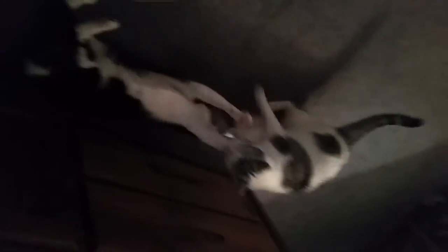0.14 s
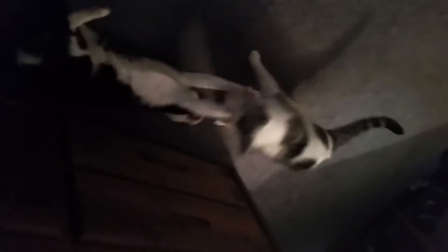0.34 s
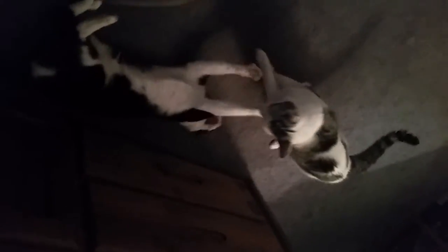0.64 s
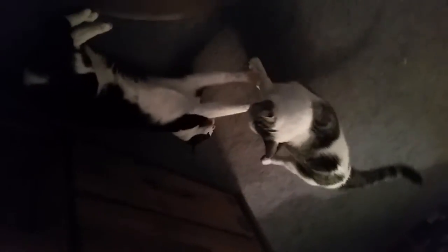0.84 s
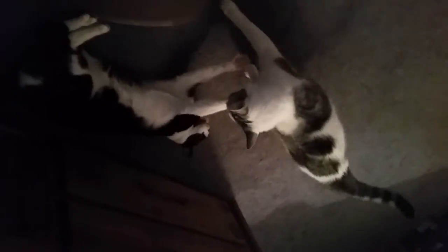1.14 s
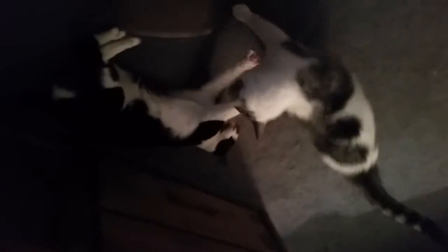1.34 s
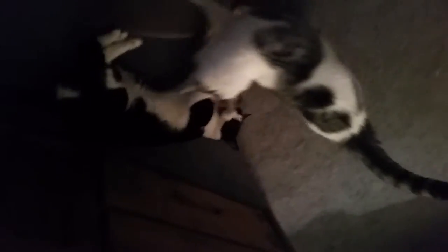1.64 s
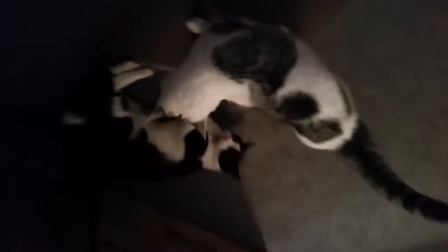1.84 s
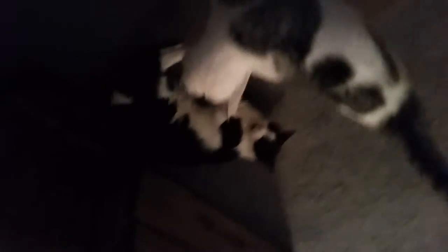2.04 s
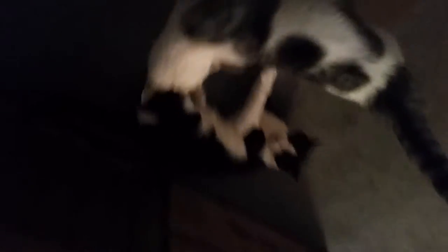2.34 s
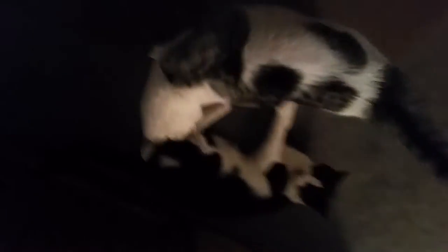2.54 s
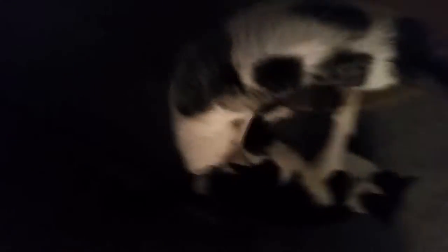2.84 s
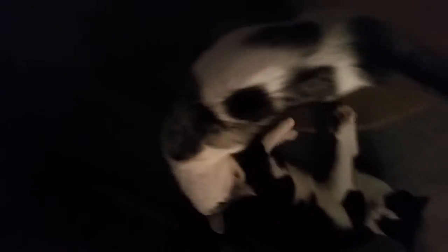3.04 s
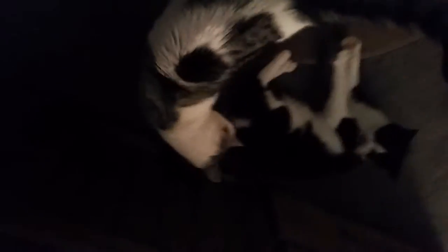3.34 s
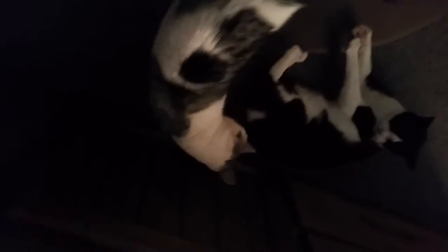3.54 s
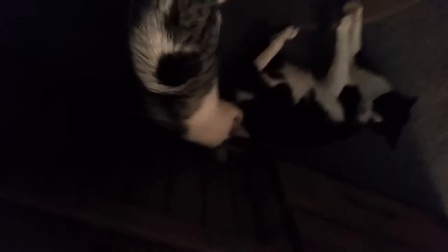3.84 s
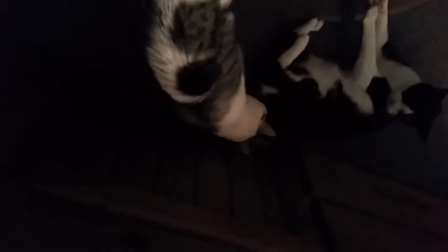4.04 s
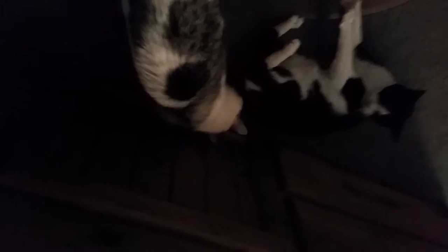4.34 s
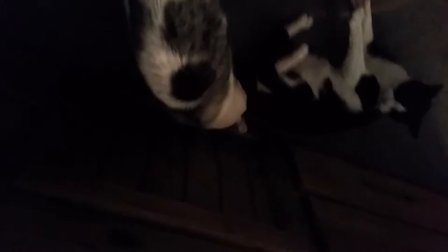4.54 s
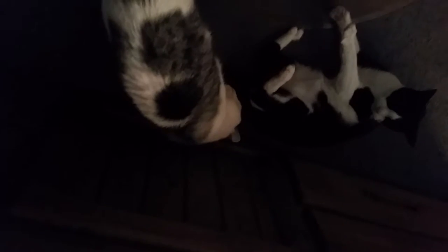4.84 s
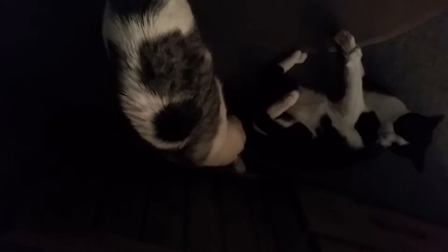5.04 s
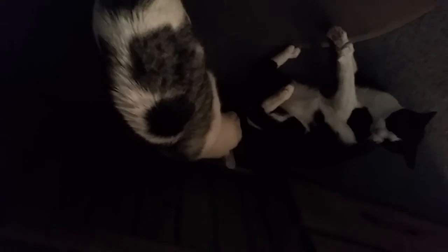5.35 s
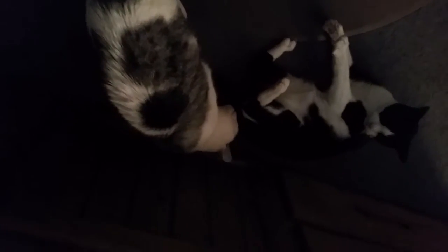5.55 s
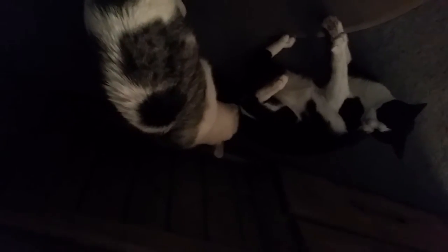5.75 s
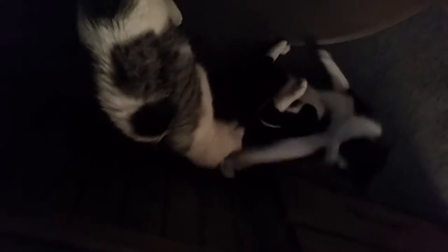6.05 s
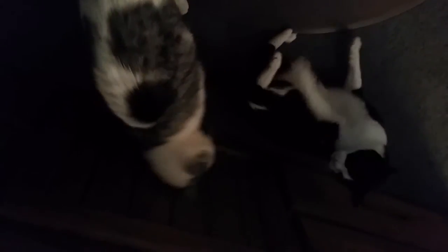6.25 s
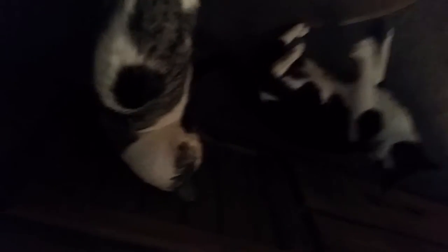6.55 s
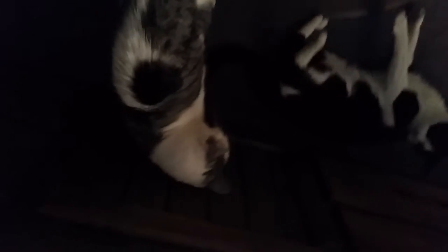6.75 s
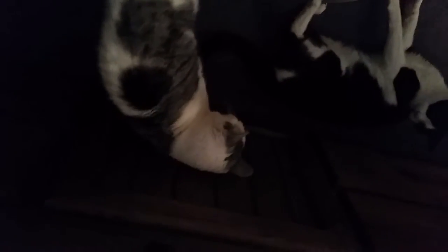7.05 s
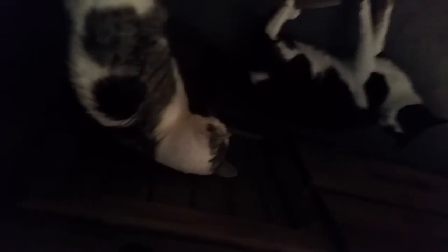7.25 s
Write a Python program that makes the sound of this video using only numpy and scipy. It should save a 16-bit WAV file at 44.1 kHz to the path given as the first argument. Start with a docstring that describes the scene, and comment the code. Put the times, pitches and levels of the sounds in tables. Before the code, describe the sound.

Dull handling pops and short creaks bump close to the microphone while two cats scuffle in soft fur rustles over a steady low appliance hum.

```python
"""A quiet carpeted room where an appliance hums: two cats wrestle near a hand-held recorder.
A finger on the left microphone port sticks and slips: pressure bumps, high-passed by the vent, give
dull pops and short creaks. A palm shifts at the right port. Fur on pile is shaped noise in bright bursts;
claws are four decaying sine ticks with scuffs. Hum is wavering tones; room tone is stereo noise."""
import sys
import numpy as np
from scipy import signal
from scipy.io import wavfile
from scipy.ndimage import uniform_filter1d

SR = 44100
rng = np.random.default_rng(int(sys.argv[2]) if len(sys.argv) > 2 else 0)


def transcribe(u):
    """Save the signal u as a 16-bit wav file named by the first command-line argument.

    u: samples, shape (n,) or (channels, n), limited to [-1, 1]; the rate is SR.
    q: integer samples, one column per channel.
    """
    v = np.clip(np.atleast_2d(u).T, -1, 1)
    q = np.round(v * 32767).astype(np.int16)
    wavfile.write(sys.argv[1], SR, q)


N = 326340


def gain_of(db):
    """Decibels to gain."""
    return 10 ** (np.asarray(db) / 20)


def evened(x):
    """Scales to rms 1."""
    return x / np.sqrt(np.mean(x ** 2) + 1e-20)


def read(points, hz):
    """Reads a spectrum table on a log frequency axis."""
    point_hz, value = np.transpose(points)
    return np.interp(np.log(hz + 1), np.log(point_hz + 1), value)


def curve(rows, t):
    """Reads every column of a curve at times t."""
    s, *columns = np.transpose(rows)
    return [np.interp(t, s, column) for column in columns]


def add(mix, s, sound):
    """Mixes a sound in at s seconds, cut at the end of the mix."""
    part = mix[..., round(s * SR):][..., :sound.shape[-1]]
    part += sound[..., :part.shape[-1]]


def low_pass(x, order, hz):
    """Butterworth low-pass."""
    return signal.sosfilt(signal.butter(order, hz, fs=SR, output="sos"), x)


def band(x, lo_hz, hi_hz):
    """Gentle band-pass."""
    return signal.sosfilt(signal.butter(2, [lo_hz, hi_hz], "band", fs=SR, output="sos"), x)


def hiss(colour, side, same, patchy_db, size=1024):
    """Stereo noise with drifting patches, mid rms 1; side tips it between ports, same sets their likeness."""
    hop = size // 4
    frames, hz = N // hop + 5, np.fft.rfftfreq(size, 1 / SR)
    a, b, c, d, patches = rng.standard_normal((frames, len(hz), 5)).T
    patches = uniform_filter1d(patches, size=9, axis=0)  # over frequency
    patches = evened(uniform_filter1d(patches, size=12, axis=1))  # over time
    same = np.clip(read(same, hz), -1, 1)[:, None]
    left, other = a + 1j * b, c + 1j * d
    right = same * left + np.sqrt(1 - same ** 2) * other
    spectra = np.array([left, right])
    spectra *= gain_of(read(colour, hz)[:, None] + patchy_db * patches)
    spectra *= gain_of(np.outer([.5, -.5], read(side, hz)))[:, :, None]
    out = signal.istft(spectra, nperseg=size, noverlap=size - hop)[1][:, :N]
    return out / np.sqrt(np.mean(out.mean(0) ** 2))


# Room tone spectrum. Each row: frequency in Hz, relative density in dB per Hz.
ROOM_COLOUR = [(88, -44), (165, -5), (363, -7.5), (523, -20.5), (750, -17), (1320, -34.5), (1790, -22),
               (2300, -31), (2890, -45.5), (3650, -36), (6120, -48), (8400, -40.5), (9700, -57),
               (11500, -45), (14600, -45)]
# Room tone likeness of the ports. Each row: frequency in Hz, left-right correlation from -1 to 1.
ROOM_SAME = [(60, 0.17), (150, 1), (380, 0.76), (950, 0.069), (2380, -0.56), (5980, 0.092), (15000, -0.17)]
# Room tone balance. Each row: frequency in Hz, left minus right in dB.
ROOM_SIDE = [(130, -6), (400, -4.5), (1400, -5), (3100, -10), (6100, -7), (9000, -2.5), (14000, 3.5)]
ROOM_DB = -49.5


def room_tone():
    """Steady coloured noise whose likeness between the ports varies with frequency."""
    return gain_of(ROOM_DB) * hiss(ROOM_COLOUR, ROOM_SIDE, ROOM_SAME, patchy_db=.4)


# Appliance tones. Each row: frequency in Hz, rms level in dB, wavering share from 0 to 1, fuzz width in Hz.
HUM_TONES = [(119.3, -45, 0.058, 3), (291.8, -54.5, 0.72, 3.1), (375.2, -61, 0.75, 6), (427, -63.5, 1, 5.2),
             (766.4, -65.5, 0.88, 23), (896, -70, 0.9, 22)]


def appliance():
    """Tones, each a steady part plus narrow noise around it."""
    t, out = np.arange(N) / SR, np.zeros(N)
    for hz, db, share, width_hz in HUM_TONES:
        r = np.exp(-np.pi * width_hz / SR)
        noise = rng.standard_normal(N) + 1j * rng.standard_normal(N)
        waver = signal.lfilter([1], [1, -r], noise)
        size = 1 - share + share * waver / waver.std()
        tone = (size * np.exp(2j * np.pi * hz * t)).real
        out += gain_of(db) * evened(tone)
    return out * gain_of([[-.5], [.5]])


# Claw ticks. Each row: start in seconds, tick level in dB, left minus right in dB, ring in Hz,
# scuff level re tick in dB, scuff t60 in seconds.
CLAW_TICKS = [(.6152, -28.5, -11, 3100, -18.5, 0.23), (.861, -50, -8, 7100, -21, .2),
              (5.7996, -36, -17, 760, -24.5, 0.05), (4.338, -38.5, -14, 530, -30, 0.086)]
# Scuffed pile spectrum. Each row: frequency in Hz, relative density in dB per Hz.
SCUFF_COLOUR = [(500, -10), (1100, -3), (1900, 1), (3200, -8.5), (5500, -11), (8800, -28), (11000, -68)]


def claws():
    """A short ringing tick, with a scuff of pile that dies away."""
    out, t = np.zeros((2, N)), np.arange(SR // 5) / SR
    scuff = hiss(SCUFF_COLOUR, [(0, 0), (SR, 0)], [(0, .3), (SR, .3)], patchy_db=0.5, size=256)
    for s, db, pan_db, hz, scuff_db, t60_s in CLAW_TICKS:
        decay = gain_of(-60 * t * hz / 8)  # 60 dB in 8 cycles
        attack = np.minimum(t * hz * 3, 1)  # a third of a cycle
        tick = np.sin(2 * np.pi * hz * t) * decay * attack
        tail = scuff[:, round(s * SR):][:, :len(t)] * gain_of(scuff_db - 60 * t / t60_s)
        add(out, s, (tick + tail) * gain_of(db + pan_db * np.array([[.5], [-.5]])))
    return out


# Strokes of fur. Each row: start in seconds, length in seconds, level before the mid-stroke arch in dB,
# swell across the stroke in dB, hollow whistle re stroke in dB.
STROKES = [(0.148, 0.049, -70.5, 0, -6), (.28, 0.044, -73, 0, -9), (1.34, 0.08, -73, 4, -18),
           (2, 0.12, -63.5, -2, -25), (2.428, 0.16, -48.5, 10, -24), (2.638, 0.057, -68.5, 0, -21),
           (2.91, 0.14, -46, 10, -32), (3.054, 0.75, -77, 3, -2), (3.285, 0.076, -58.5, 10, -8),
           (3.361, 0.041, -66, 3, -12), (3.429, 0.037, -65, 3, -4), (3.49, 0.11, -57.5, 9.5, -5),
           (3.705, 0.1, -63.5, 5.5, -11.5), (3.981, 0.1, -55.5, 4.5, -17), (4.31, 0.1, -67.5, 3, -11),
           (4.415, 0.11, -69.5, -1.5, -15), (4.588, 0.11, -58, 6, -20), (4.695, 0.1, -62, 6, -16)]
# Fur hiss spectrum. Each row: frequency in Hz, relative density in dB per Hz.
FUR_COLOUR = [(400, -33.5), (900, -14), (1900, 3), (2900, -9.5), (4200, -5.5), (5300, -3.5), (6000, -13),
              (7300, -1.5), (8800, -0.5), (10200, -11), (11800, -1), (13800, 1), (14800, -3.5)]
# Fur balance. Each row: frequency in Hz, left minus right in dB.
FUR_BALANCE = [(1000, -2), (3000, -8), (5000, -10), (6100, -18), (7600, -11), (10000, -13), (13000, -12)]
# Hollow whistle spectrum. Each row: frequency in Hz, relative density in dB per Hz.
WHISTLE_COLOUR = [(3900, -25), (4700, -6), (5250, 0), (5800, -7), (6600, -25)]
TAIL_T60_S, TAIL_GAIN = .45, .55


def rustle():
    """Strokes of fur on pile: fine hiss, louder at the uncovered right port, with a fading room tail."""
    level, hollow = np.zeros((2, N))
    for s, length_s, db, swell_db, whistle_db in STROKES:
        u = np.arange(0, 1, 1 / (length_s * SR))
        arch_db = 2.5 - 7 * (2 * u - 1) ** 2  # fastest mid-stroke
        stroke_db = db + swell_db * (u - 1.0) + arch_db
        stroke = gain_of(stroke_db) * signal.windows.tukey(len(u), .3)
        add(level, s, stroke)
        add(hollow, s, stroke * gain_of(whistle_db))
    r = np.exp(-np.log(1000) / (TAIL_T60_S * SR))
    tail = signal.lfilter([1 - r], [1, -r], level)
    level = np.hypot(level, TAIL_GAIN * tail)
    apart = [(0, 0), (SR, 0)]  # ports uncorrelated
    fur = hiss(FUR_COLOUR, FUR_BALANCE, apart, patchy_db=2.0, size=256)
    whistle = hiss(WHISTLE_COLOUR, FUR_BALANCE, apart, patchy_db=1.5, size=256)
    return level * fur + hollow * whistle


def push(u, skew):
    """One smooth bump of pressure over u = 0..1; skew under 1 starts suddenly."""
    return np.sin(np.pi * np.clip(u, 0, 1) ** np.clip(skew, .2, 1.5)) ** 2


def bump(length_ms, skew):
    """A push sampled over length_ms."""
    return push(np.arange(0, length_ms, 1000 / SR) / length_ms, skew)


SLOW_SKEW, SKEW_PER_RATE = 0.36, 0.0017  # slower creaks let go more suddenly


def creak(s, length_s, rate_hz, end_rate_hz, pressure, end_pressure, share):
    """Skin sticks and lets go again and again, each slip a little unlike the last."""
    u = np.arange(0, 1, 1 / (length_s * SR))
    rate_hz = rate_hz + (end_rate_hz - rate_hz) * u
    pressure = pressure + (end_pressure - pressure) * u
    wobble = evened(uniform_filter1d(rng.standard_normal(len(u)), size=200))
    turns = np.cumsum(rate_hz * (1 + .1 * wobble)) / SR
    uneven = gain_of(2.4 * rng.standard_normal(64))[turns.astype(int)]  # one gain a slip
    slips = push(turns % 1 / share, SLOW_SKEW + SKEW_PER_RATE * rate_hz)
    return slips * pressure * uneven * signal.windows.tukey(len(u), .1)


def small_slips():
    """Small unsteady slips of either sign, soft and hard, about 60 a second."""
    chance, sign, hardness = rng.random((N, 3)).T
    hits = (chance < 60 / SR) * np.sign(sign - .5) * gain_of(-4.0 * np.log(hardness + 0.003))
    return gain_of(-40.0) * signal.oaconvolve(hits, push(np.linspace(0, 1, 260), 0.84))[:N]


def judder(pressure):
    """Skin judders while the pressure builds, far more in sudden slips."""
    building = uniform_filter1d(np.maximum(np.gradient(abs(pressure)), 0), size=60)
    noise = evened(band(rng.standard_normal(N), 410, 1480))
    return gain_of(24.5) * abs(building) ** 1.66 * noise


PORT_HZ, PORT_WIDTH_HZ, PORT_EDGE_HZ = 1900, 1900, 3000
VENT_HZ = 80


def port(air):
    """A port resonates broadly and passes little above; pressure leaks away below VENT_HZ."""
    r = np.exp(-np.pi * PORT_WIDTH_HZ / SR)
    poles = [1, -2 * r * np.cos(2 * np.pi * PORT_HZ / SR), r * r]
    air = low_pass(signal.lfilter([sum(poles)], poles, air), 3, PORT_EDGE_HZ)
    return signal.sosfilt(signal.butter(3, VENT_HZ, "high", fs=SR, output="sos"), air)


# Fingertip slips over the left port. Each row: start in seconds, relative pressure (+ push, - pull),
# length in ms, skew (under 1 = sudden start).
FINGER_SLIPS = [(0.508, 0.07, 1.64, 0.59), (0.5268, 0.21, 3.6, 0.68), (0.5372, 0.33, 4.1, 0.54),
                (0.5561, 0.67, 3.6, .62), (0.5832, 0.18, 2.1, 0.73), (0.5871, 0.71, 2.76, 0.55),
                (0.6772, 0.15, 2.16, 1.5), (0.6812, 1.01, 4, 0.52), (0.7014, 0.14, 2.6, 0.75),
                (0.7026, 0.26, 1.35, 0.95), (0.7127, 0.99, 6.4, 0.52), (0.7122, -0.038, 1, 0.79),
                (0.731, 0.14, 3.1, 0.6), (0.7401, 1.18, 5, 0.67), (0.7598, -0.1, 2.2, 1),
                (0.7605, 0.16, 1, 0.62), (0.7735, 1.17, 5.1, 0.59), (0.8024, -0.19, 5.7, 1.05),
                (0.9843, -0.085, 5.1, 0.66), (1.0174, -0.077, 5.2, 0.64), (1.0837, -0.11, 4.6, 0.72),
                (1.2421, -0.11, 5.1, 0.63), (1.264, -0.11, 4.2, 0.69), (1.782, -0.38, 4.4, 0.75),
                (1.8857, -0.16, 3.5, 0.6), (1.9112, -0.16, 7.5, 0.48), (2.0372, 0.17, 1.8, 0.69),
                (2.05, -0.23, 1.7, 0.57), (2.067, -0.45, 5.0, 0.45), (2.0819, -0.3, 3.9, 0.55),
                (2.269, 0.085, 2.8, 0.65), (2.4664, 0.16, 1.6, 0.7), (2.6805, -0.22, 14, .66),
                (2.6878, 0.06, 2.1, 0.77), (2.741, 0.26, 7, .74), (2.957, -0.14, 3.9, 0.84),
                (2.969, -0.065, 3.2, 0.53), (2.986, -0.16, 5.9, 0.62), (3.0034, -0.22, 8.7, 0.6),
                (3.02, -0.25, 6.1, 1.24), (3.0307, -0.31, 7.8, 0.94), (3.066, -0.17, 8.8, 0.78),
                (3.0967, 0.1, 7.1, 0.76), (4.3377, 0.12, 11, 0.5), (4.765, 0.09, 3.0, 0.56),
                (4.8627, 0.29, 6.7, .9), (4.8723, 0.49, 6.3, 0.82), (4.8844, 0.48, 5.2, 0.73),
                (4.9015, 0.37, 9.4, 0.65), (4.9355, 0.34, 7.3, 0.92), (4.9354, 0.14, 2.4, 1.05),
                (4.9621, 0.32, 3.6, 0.86), (4.9797, 0.42, 4.5, 1.13), (4.997, 0.3, 4.3, 0.66),
                (5.0373, 0.08, 2.7, 0.61), (5.04, 0.45, 4.1, 0.61), (5.0494, 0.98, 7.2, 0.55),
                (5.0598, -0.02, 2.9, .51), (5.0617, 0.15, 0.77, 0.81), (5.0624, 0.92, 5.3, 1.23),
                (5.0806, 0.34, 1.67, 0.61), (5.4152, 0.11, 3.3, 0.66), (5.709, 0.19, 16, 0.81),
                (6.2133, 0.084, 8.6, 1.1), (6.8936, -0.16, 6.5, 1.16), (7.1802, 0.099, 9.2, 0.52),
                (7.3155, -0.12, 11, 0.48)]
# Palm shifts against the right port. Each row: start in seconds, relative pressure, length in ms.
PALM_SHIFTS = [(3.4325, -0.22, 20), (3.443, 0.24, 7.9), (4.0025, -0.27, 8.8), (4.0123, -0.1, 8.1),
               (4.0365, 0.1, 13), (5.095, 0.15, 14)]
# Runs of slips. Each row: start in seconds, length in seconds, slips per second at start, at end,
# relative pressure at start, at end, share of the cycle spent slipping.
CREAK_RUNS = [(2.023, 0.047, 86, 82, -0.37, -0.5, 1), (2.0267, 0.033, 77, 75, -0.55, -0.31, 0.52),
              (2.467, .066, 235, 233, 0.1, 0.23, 0.74), (2.533, .05, 122, 85, 0.48, .36, .7),
              (2.905, 0.048, 300, 190, -0.13, -.3, 0.76)]
# Restless grip. Each row: time in seconds, slow squeeze in dB before the port balance,
# fine scrape in dB before the port filter.
GRIP_CURVE = [(0, -58, -61.5), (.5, -44, -63), (.8, -47.5, -61.5), (1.3, -49.5, -65.5), (1.8, -61, -74),
              (1.96, -44, -51.5), (2.04, -37, -52.5), (2.13, -45, -60), (2.44, -53, -69), (2.53, -43, -64),
              (2.88, -48, -70), (2.96, -52, -59.5), (3.5, -45.5, -59.5), (4.35, -56, -64.5),
              (4.9, -43, -62.5), (5.2, -48.5, -67), (6.2, -55, -74), (7.4, -46, -72)]
PALM_SKEW, PALM_EDGE_HZ = 0.56, 700


def finger():
    """Slips, creaks, squeeze and scrape pump the air at the ports; the vent turns each bump into a pop."""
    air = np.zeros((2, N))
    left, right = air
    for s, pressure, length_ms, skew in FINGER_SLIPS:
        add(left, s, pressure * bump(length_ms, skew))
    for s, pressure, length_ms in PALM_SHIFTS:
        add(right, s, pressure * bump(length_ms, PALM_SKEW))
    for row in CREAK_RUNS:
        add(left, row[0], creak(*row))
    left += small_slips()
    right[:] = low_pass(right, 2, PALM_EDGE_HZ)  # softer palm
    left += judder(left)
    squeeze_db, scrape_db = curve(GRIP_CURVE, np.arange(N) / SR)
    grit = (rng.random(N) < 5000 / SR) * rng.standard_normal(N)  # 5000 grains a second
    left += evened(band(grit, 320, 2830)) * gain_of(scrape_db)
    squeeze = evened(band(rng.standard_normal((2, N)), 27, 78))
    return port(air) + squeeze * gain_of(squeeze_db + np.array([[4.0], [-4.0]]))


def scene():
    """Room tone, hum, cats and the hand on the recorder."""
    return room_tone() + appliance() + finger() + rustle() + claws()


EDGE_HZ = 14640


def record(dry):
    """The band limit: a steep linear-phase low-pass."""
    taps = signal.firwin(1023, EDGE_HZ, window=("kaiser", 10), fs=SR)
    return signal.oaconvolve(dry, taps[None], "same")


dry = scene()
out = record(dry)
transcribe(out)
```